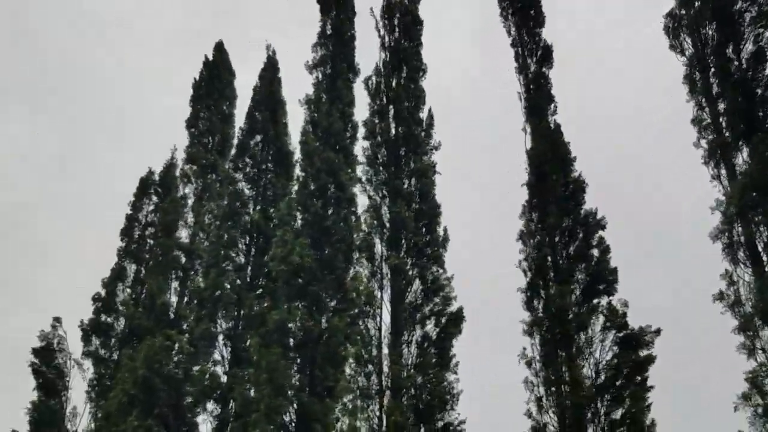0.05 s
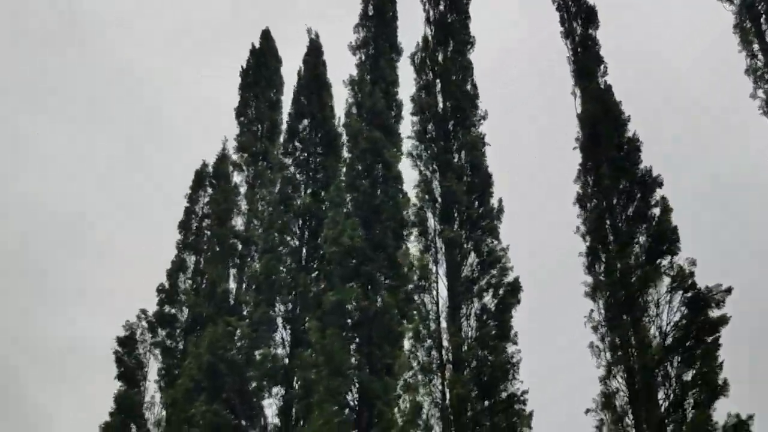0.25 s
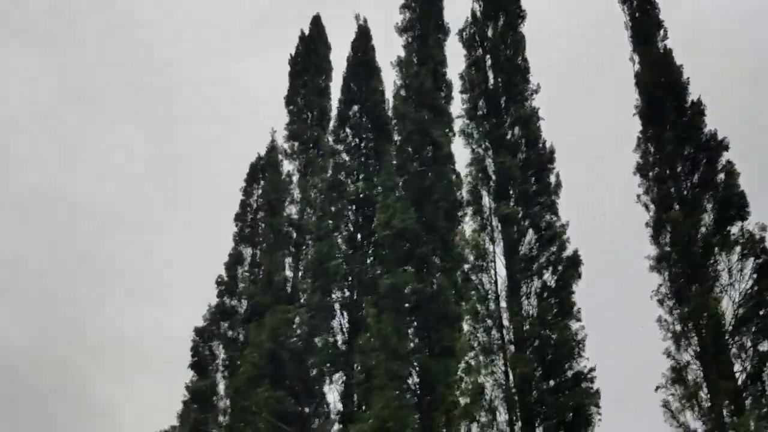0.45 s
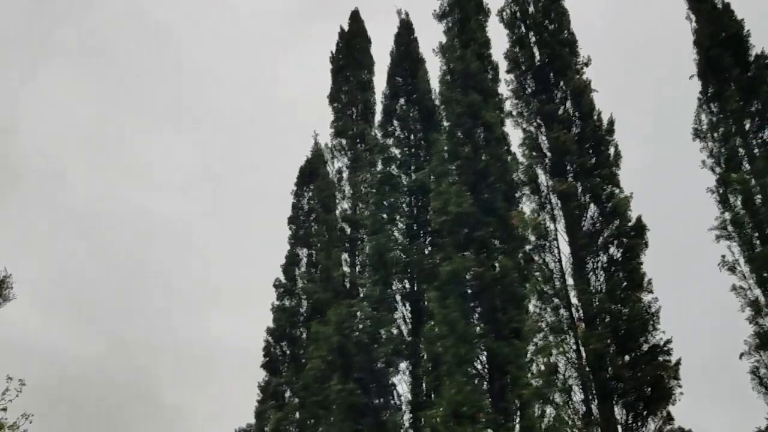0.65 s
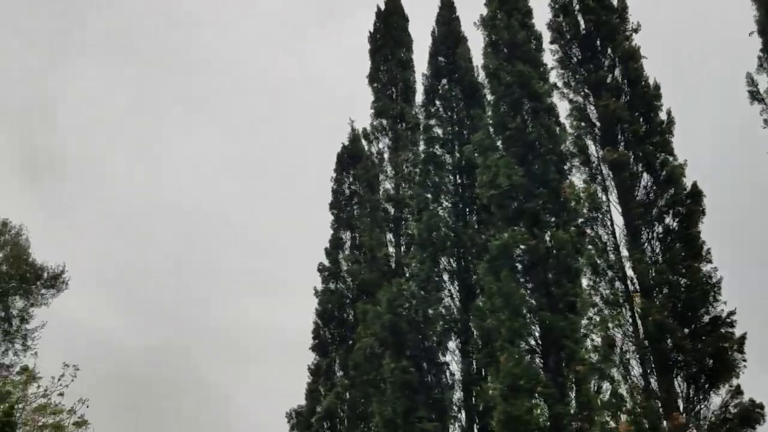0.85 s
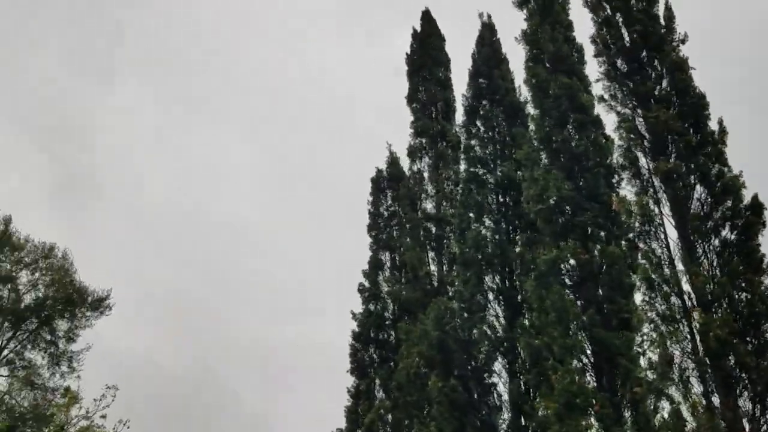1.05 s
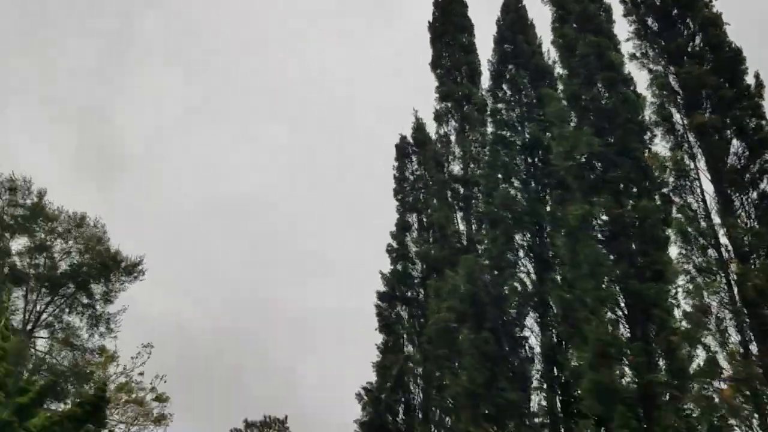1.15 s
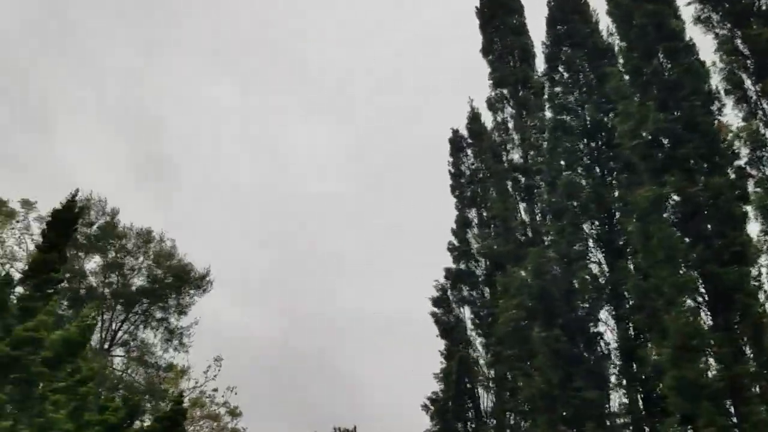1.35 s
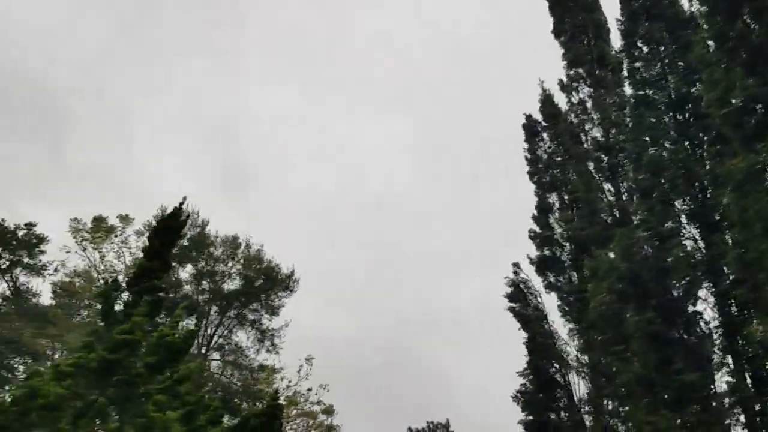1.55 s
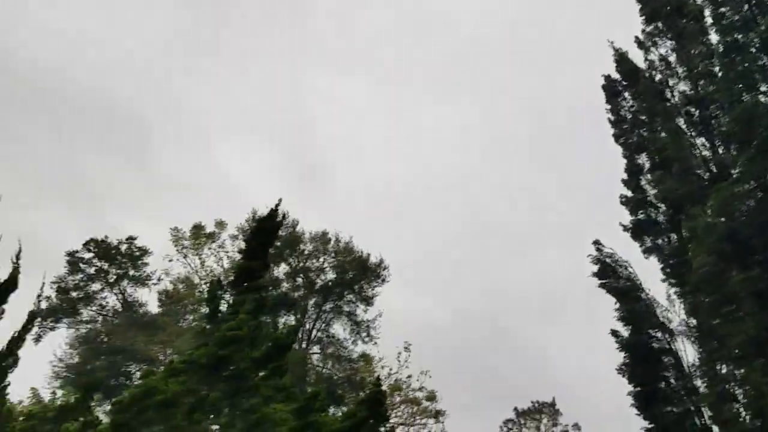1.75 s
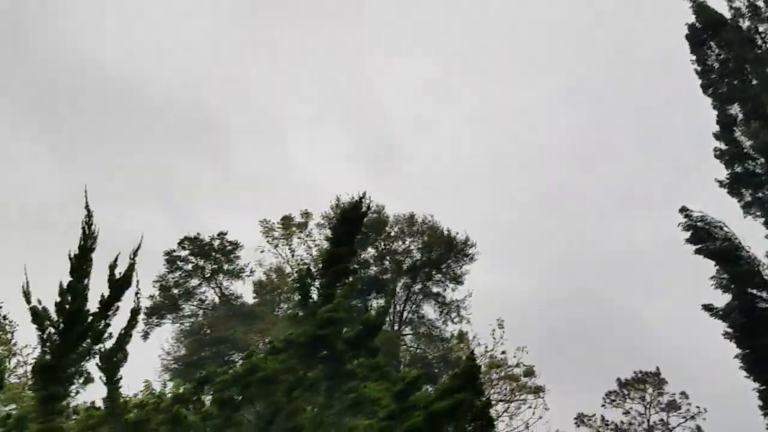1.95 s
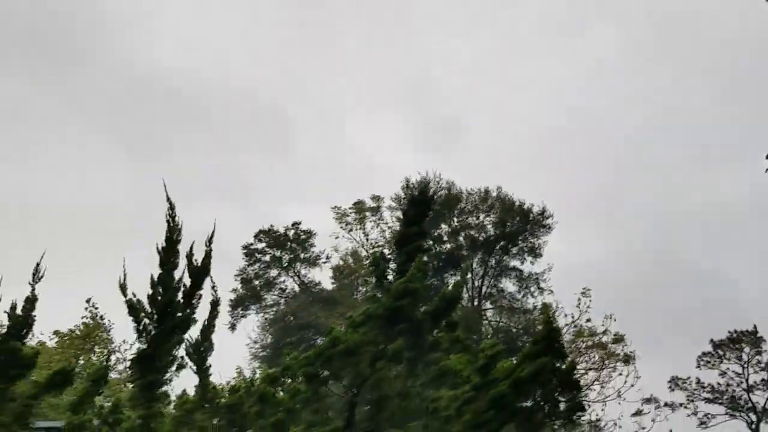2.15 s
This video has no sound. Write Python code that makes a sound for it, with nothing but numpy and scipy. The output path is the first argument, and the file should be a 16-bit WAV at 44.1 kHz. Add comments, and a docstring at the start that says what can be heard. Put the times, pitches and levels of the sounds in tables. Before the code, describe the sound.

Wind rushes steadily through tall trees outdoors while uneven gusts rumble and thump against the microphone. A small, distant bird gives a few faint, thin notes, and the leaves hiss slightly more after the strongest gust.

```python
"""From the start, wind rushes through tall trees, leaves touch with tiny ticks, and gusts give each
of the microphone's two openings (ports) its own lumpy rumble. Almost at once, single swirls of air
(eddies) begin to thump against the ports, and a few sharp flicks crackle. From about 0.65 s a small,
far bird gives a few thin rising notes. The gusts peak near 1.4 s; just after, the wind in the trees
freshens and the leaves hiss a little more."""
import sys
import numpy as np
from scipy.fft import rfft, irfft
from scipy.io import wavfile

SR = 44100
rng = np.random.default_rng(int(sys.argv[2]) if len(sys.argv) > 2 else 0)


def store_pcm(level_fs):
    """Save levels as 16-bit WAV."""
    pcm = np.round(np.clip(level_fs, -1, 1) * 32767).astype(np.int16)
    wavfile.write(sys.argv[1], SR, np.atleast_2d(pcm).T)


N = 97020
T = np.arange(N) / SR
HZ = np.maximum(np.arange(N // 2 + 1) * SR / N, 1)

# tone of the rushing trees at the left and the right port: pitch_hz, relative_db
RUSH_TONE_LEFT = [(20, -7), (100, 5), (400, -4), (650, -1.5), (950, 0), (1200, -3.5), (1500, -2.5),
                  (2000, -6.5), (2600, -7), (4000, -13), (6400, -16.5), (7900, -14.5), (8900, -22),
                  (10000, -20), (11400, -15.5), (13000, -20), (16000, -21.5)]
RUSH_TONE_RIGHT = [(20, -15), (100, -4.5), (400, -7.5), (650, 2), (950, 0), (1600, -0.5), (2000, -1),
                   (2700, -8.5), (3500, -9), (5000, -15), (6700, -17.3), (7400, -22), (8200, -24),
                   (9600, -18), (11500, -19), (12800, -22), (16000, -25)]
# level of that rush before the wind swells it: left_db, right_db
RUSH_LEVELS = [-40.5, -40]
# how the wind swells in the treetops: time_s, change_db
WIND_SWELL = [(0, -0.25), (.5, -1), (.72, 0.4), (1.2, 0.5), (1.55, 1.7), (1.85, 1.3), (2.2, .8)]
# tone of leaves and twigs touching: pitch_hz, relative_db
TICK_TONE = [(500, -27), (2000, -5), (5000, -7), (12000, 6), (16000, -7)]
# air flow over the ports, as the level of its rumble: time_s, level_db
AIR_FLOW = [(0, -36.5), (.1, -38), (.165, -43.5), (.21, -29.5), (.25, -29), (.32, -30.5), (.36, -28.5),
            (.46, -26), (.55, -32), (.625, -29), (.645, -32.5), (.71, -36), (.765, -39.5), (.783, -62),
            (.795, -36.5), (.92, -31.5), (.965, -34.5), (1.098, -35.5), (1.108, -52), (1.135, -49),
            (1.152, -29.5), (1.228, -31), (1.252, -39.5), (1.275, -29.5), (1.315, -27.5), (1.345, -23.5),
            (1.405, -22), (1.422, -35), (1.44, -31), (1.47, -34), (1.495, -33), (1.58, -29.5), (1.655, -31),
            (1.677, -41), (1.70, -27.5), (1.755, -39), (1.815, -29.5), (1.86, -31), (1.875, -38),
            (1.92, -38), (1.97, -36), (2.0, -46), (2.035, -36.5), (2.115, -37), (2.135, -51.5), (2.16, -34),
            (2.2, -46)]
# which port gets more of the flow: time_s, left_minus_right_db
FLOW_BALANCE = [(0, -3), (.1, -11), (.24, -4.5), (.43, -2), (.52, 2), (.69, -4.5), (.75, 5.5), (.83, 1.5),
                (.91, -6.5), (.97, -0.5), (1.16, 2.5), (1.25, -6), (1.35, -2.5), (1.44, -4.5), (1.5, 0),
                (1.55, -4.5), (1.6, -8.5), (1.66, 3.5), (1.74, 0.5), (1.81, -3), (1.86, 0), (1.91, -6),
                (2.2, 2.5)]
# tone of the rumble in a moderate flow: pitch_hz, relative_db
RUMBLE_TONE = [(20, -15), (40, -5), (100, 2), (190, -3.5), (340, -4.5), (450, -8), (620, -16.5), (900, -22),
               (1400, -38), (2500, -66)]
# single eddies hitting the ports: peak_s, width_s, left_db, right_db, pitch_hz
EDDY_HITS = [(0.094, .004, -43, -28.5, 381), (0.202, 0.0037, -22, -22, 353), (0.219, 0.0071, -31, -31, 343),
             (0.256, 0.0054, -32, -26.5, 250), (.286, 0.0024, -19.5, -22.5, 390),
             (.299, .003, -23, -18.5, 300), (.313, 0.0049, -35, -21, 373), (0.324, 0.0039, -29, -21.5, 123),
             (0.36, 0.0042, -25.5, -21.5, 363), (0.388, .006, -25, -24, 305),
             (.412, 0.0052, -17, -17.5, 356), (0.462, 0.0096, -25.5, -24.5, 366),
             (0.497, 0.0015, -14.5, -19, 324), (.510, 0.0039, -14, -15.5, 342),
             (.577, 0.0027, -14, -13.5, 348), (0.591, 0.0033, -22.5, -27, 410),
             (.618, 0.0041, -25, -27, 350), (.624, 0.0022, -31, -25.5, 130),
             (0.706, 0.0057, -55, -27.5, 280), (.795, 0.0024, -26.5, -27, 325),
             (0.823, 0.0052, -25.5, -30, 431), (.935, 0.0068, -34.5, -29, 434),
             (1.008, 0.0029, -33, -24.5, 258), (1.233, 0.0022, -40, -27.5, 346),
             (1.28, 0.0038, -25, -27, 360), (1.291, 0.0026, -21, -14.5, 325),
             (1.334, 0.0044, -17, -17, 303), (1.347, 0.0063, -17, -17.5, 160),
             (1.363, 0.0037, -15.5, -19, 290), (1.377, 0.0066, -18.5, -14.5, 412),
             (1.409, 0.0047, -13.5, -16, 378), (1.436, 0.007, -25, -28, 108),
             (1.484, 0.0027, -34, -25.5, 326), (1.512, 0.0031, -22, -24.5, 344),
             (1.576, 0.0056, -31, -22.5, 312), (1.635, 0.0037, -23.5, -30, 288),
             (1.655, .004, -27.5, -39, 290), (1.696, 0.0055, -23.5, -26, 281),
             (1.707, 0.0089, -30, -25.5, 126), (1.727, 0.0024, -29.5, -42, 352),
             (1.777, 0.0045, -26.5, -24.5, 370), (1.815, 0.0025, -35, -25.5, 200),
             (1.836, 0.0077, -28.5, -29.5, 324), (1.858, 0.0032, -25.5, -33, 270),
             (1.916, 0.0053, -33, -26, 296)]
# tone of an eddy's thump: pitch_hz, relative_db
THUMP_TONE = [(30, -31), (100, -7.5), (220, -2.5), (340, 1.5), (460, -0.5), (650, -11.5), (950, -28),
              (2000, -47), (4000, -66)]
# sharp flicks of air on a port: peak_s, width_s, left_db, right_db
AIR_FLICKS = [(.297, 0.0011, -25.5, -42), (.322, 0.0019, -41, -32), (1.26, .002, -50, -32.5),
              (1.332, .002, -33, -39), (1.376, .005, -37, -35), (1.408, 0.0066, -35.5, -36),
              (1.632, 0.001, -32, -48)]
# tone of their crackle: pitch_hz, relative_db
CRACKLE_TONE = [(200, -14), (800, 2.5), (1150, 6.5), (1600, -4), (3000, -10), (6000, -25), (14000, -31)]
# the bird's notes: start_s, length_s, start_hz, end_hz, level_db
BIRD_NOTES = [(.645, 0.097, 4500, 4800, -57), (0.78, .062, 7450, 8150, -54.5),
              (.935, 0.044, 7900, 8200, -51.5), (0.964, .045, 8200, 8500, -55.5),
              (1.514, .05, 7700, 8100, -57)]


def from_db(db):
    """Turns decibels into a number to multiply a sound by."""
    return 10 ** (np.asarray(db) / 20)


def unit_level(x):
    """Scales each channel to an average strength (rms) of 1."""
    return x / np.sqrt(np.mean(x ** 2, axis=-1, keepdims=True) + 1e-20)


def curve(rows):
    """Joins points in time with straight lines, giving a value for every sample."""
    return np.interp(T, *np.transpose(rows))


def with_tone(x, tone):
    """Shapes the lows and highs of a noise to follow a tone table, at strength 1."""
    hz, db = np.transpose(tone)
    gain = from_db(np.interp(np.log(HZ), np.log(hz), db))
    return unit_level(irfft(rfft(x) * gain, N))


def white_noise():
    """Plain hiss, different in each of the two channels."""
    return rng.standard_normal((2, N))


def wander(rate_hz):
    """A random wobble of strength 1 in two channels, mostly slower than rate_hz."""
    return unit_level(irfft(rfft(white_noise()) / (1 + (HZ / rate_hz) ** 2), N))


def steady_noise(tone, span_s):
    """Noise with a given tone, its strength evened out over about span_s."""
    noise = with_tone(white_noise(), tone)
    power = irfft(rfft(noise ** 2) * np.exp(-2 * (HZ * span_s) ** 2), N)
    return noise / np.sqrt(np.abs(power) + 1e-9)


def bell_curve(peak_s, width_s, left_db, right_db):
    """A smooth rise and fall with its own height at each port."""
    shape = np.exp(-.5 * np.minimum(((T - peak_s) / width_s) ** 2, 100))
    return from_db([[left_db], [right_db]]) * shape


def rushing_trees(delay_s=0.00041, shared_below_hz=6000, leaves_above_hz=3480):
    """Wind makes a broad rush in the trees; the leaf hiss follows its swell more than the branches do."""
    left, unrelated = rfft(white_noise())
    shared = 0.23 / (1 + (HZ / shared_below_hz) ** 4)
    delayed = left * np.exp(-2j * np.pi * HZ * delay_s)   # the shared part reaches the right port later
    right = shared * delayed + np.sqrt(1 - shared ** 2) * unrelated
    rush = np.array([with_tone(irfft(left, N), RUSH_TONE_LEFT),
                     with_tone(irfft(right, N), RUSH_TONE_RIGHT)])
    rush *= from_db(RUSH_LEVELS)[:, None]
    branches = irfft(rfft(rush) / (1 + (HZ / leaves_above_hz) ** 2), N)
    leaf_hiss = rush - branches
    swell_db = curve(WIND_SWELL)
    flutter_db = 0.6 * wander(rate_hz=22)
    return branches * from_db(0.38 * swell_db) + leaf_hiss * from_db(1.47 * swell_db + flutter_db)


def ticking_leaves(level_db=-61.5, spread_db=0):
    """Nearer leaves touch at random with tiny ticks, more often as the wind swells."""
    ticks_per_s = 270 * from_db(2 * curve(WIND_SWELL))
    touches = rng.random((2, N)) < ticks_per_s / SR
    sizes = from_db(spread_db * np.minimum(rng.exponential(1, (2, N)), 4))   # all equal at spread 0
    clicks = touches * sizes * np.sign(white_noise())
    return from_db(level_db) * with_tone(clicks, TICK_TONE)


def rumbling_gusts(moderate_db=-30.5, brighten_above_hz=177, brighten_per_octave=0.18):
    """Churning air makes a lumpy rumble at each port, louder and brighter in a stronger flow."""
    lumps_db = 2.0 * wander(rate_hz=45)
    flow_db = curve(AIR_FLOW) + curve(FLOW_BALANCE) * np.array([[.5], [-.5]]) + lumps_db
    rumble_spectrum = rfft(steady_noise(RUMBLE_TONE, span_s=0.016))
    octaves_up = np.clip(np.log2(HZ / brighten_above_hz), 0, 4)
    out = np.zeros((2, N))
    for octave in range(5):
        band = irfft(rumble_spectrum * np.maximum(1 - np.abs(octaves_up - octave), 0), N)
        brighten_db = octave * brighten_per_octave * (flow_db - moderate_db)
        out += band * from_db(flow_db + brighten_db)
    return out


def thumping_eddies(ring_share=0.35, base_pitch_hz=340):
    """Each eddy rings briefly inside a dull thump, both at its own pitch; sharp flicks add crackle."""
    dull_noise = np.sqrt(1 - ring_share) * steady_noise(THUMP_TONE, span_s=0.0046)
    out = crackling_flicks()
    for peak_s, width_s, left_db, right_db, pitch_hz in EDDY_HITS:
        cycles = pitch_hz * (T - peak_s) + rng.random((2, 1))
        ring = np.sqrt(2 * ring_share) * np.sin(2 * np.pi * cycles)
        read_at_s = peak_s + (T - peak_s) * pitch_hz / base_pitch_hz   # noise read faster sounds higher
        thump = np.array([np.interp(read_at_s, T, port) for port in dull_noise])
        out += bell_curve(peak_s, width_s, left_db, right_db) * (ring + thump)
    return out


def crackling_flicks():
    """The sharpest flicks of air hit a port as very short, bright bursts of noise."""
    bursts = sum(bell_curve(*flick) for flick in AIR_FLICKS)
    return bursts * steady_noise(CRACKLE_TONE, span_s=0.0043)


def far_bird(blur_hz=200):
    """A small bird sings thin rising notes, blurred as they scatter among the trees."""
    out = np.zeros((2, N))
    for start_s, length_s, start_hz, end_hz, level_db in BIRD_NOTES:
        progress = np.clip((T - start_s) / length_s, 0, 1)
        pitch_hz = start_hz + (end_hz - start_hz) * progress
        phase = 2 * np.pi * np.cumsum(pitch_hz) / SR
        blurred_note = wander(blur_hz) * np.sin(phase) + wander(blur_hz) * np.cos(phase)
        out += from_db(level_db) * np.sin(np.pi * progress) * blurred_note
    return out


def scene():
    """Adds the trees and the bird to the wind on the microphone."""
    return rushing_trees() + ticking_leaves() + far_bird() + rumbling_gusts() + thumping_eddies()


def record(dry):
    """Cuts away the very highest treble steeply."""
    cutoff_hz = 15850
    return irfft(rfft(dry) / np.sqrt(1 + (HZ / cutoff_hz) ** 400), N)


dry = scene()
out = record(dry)
store_pcm(out)
```